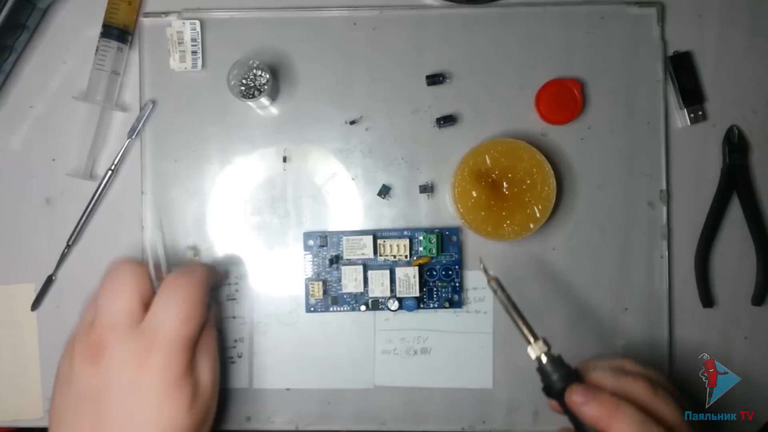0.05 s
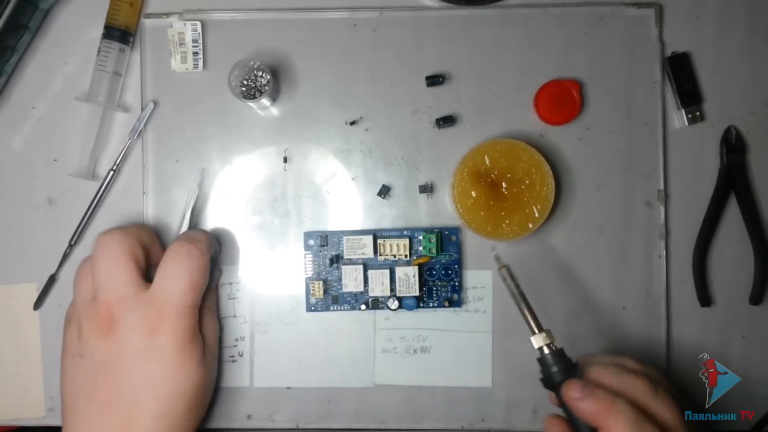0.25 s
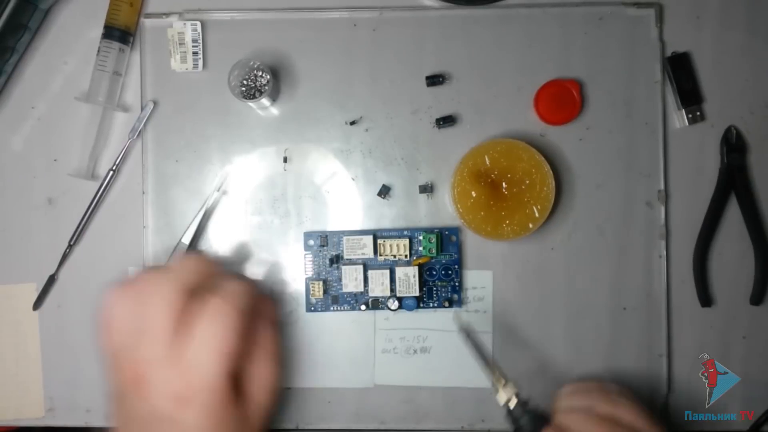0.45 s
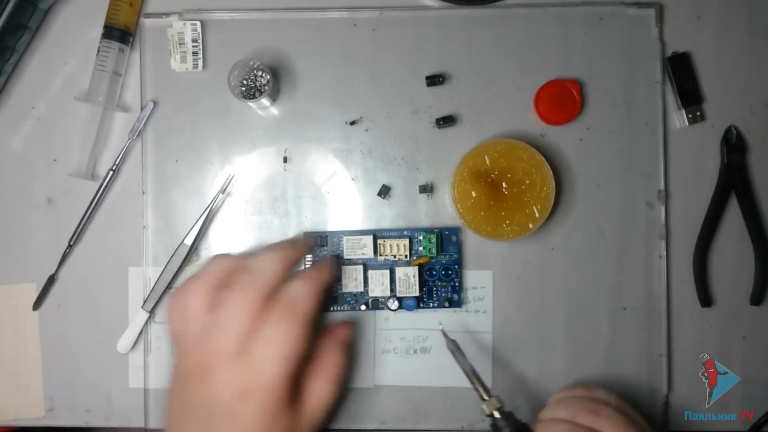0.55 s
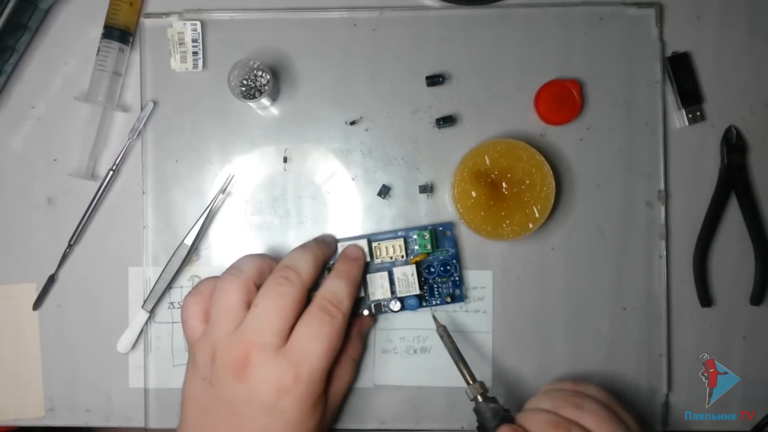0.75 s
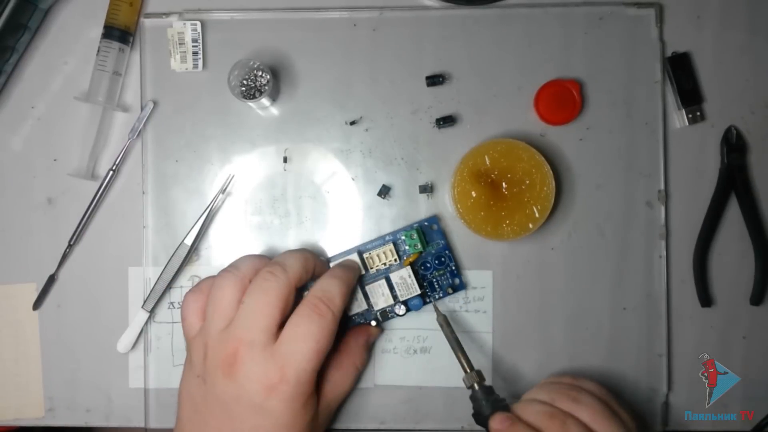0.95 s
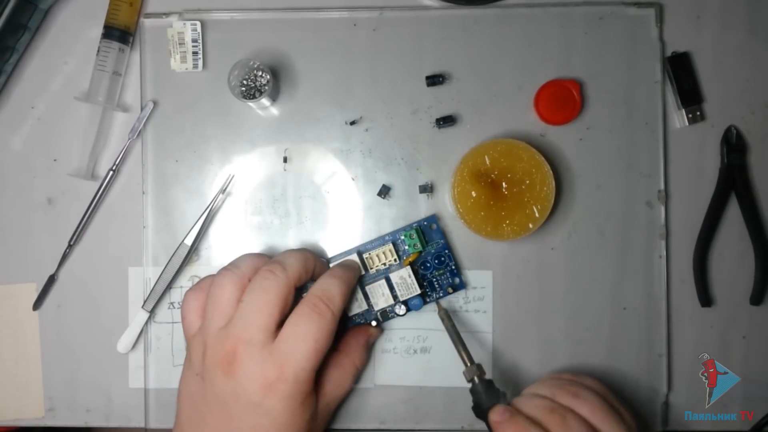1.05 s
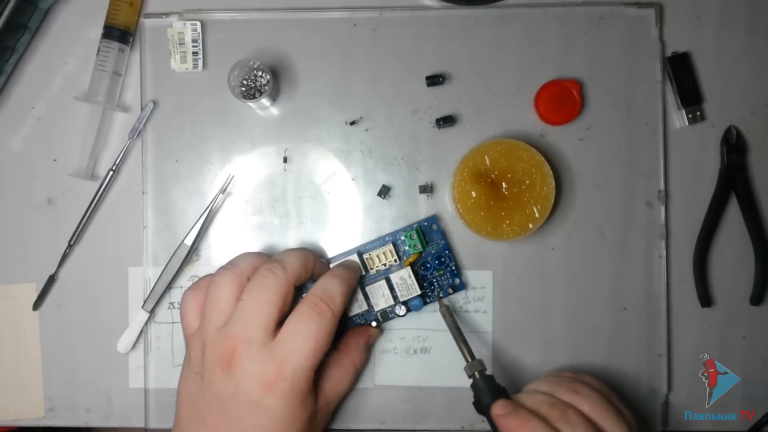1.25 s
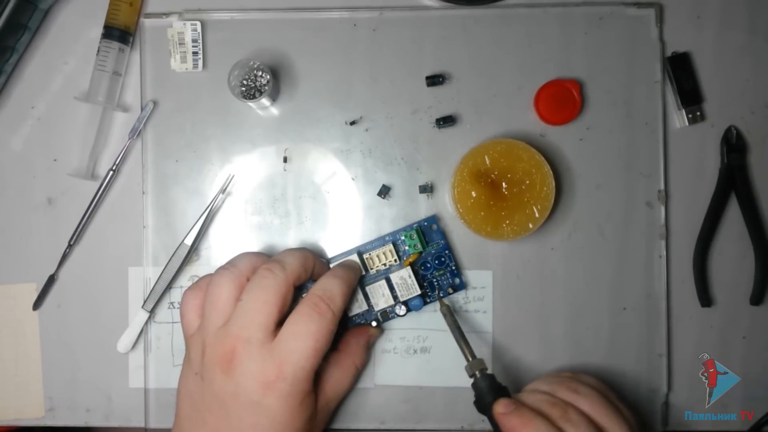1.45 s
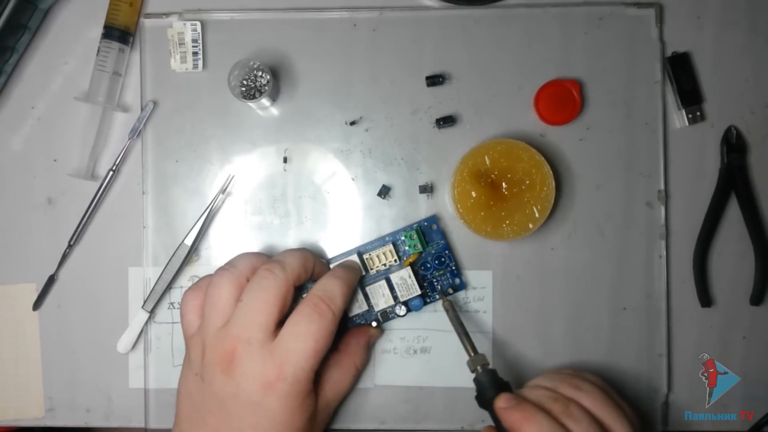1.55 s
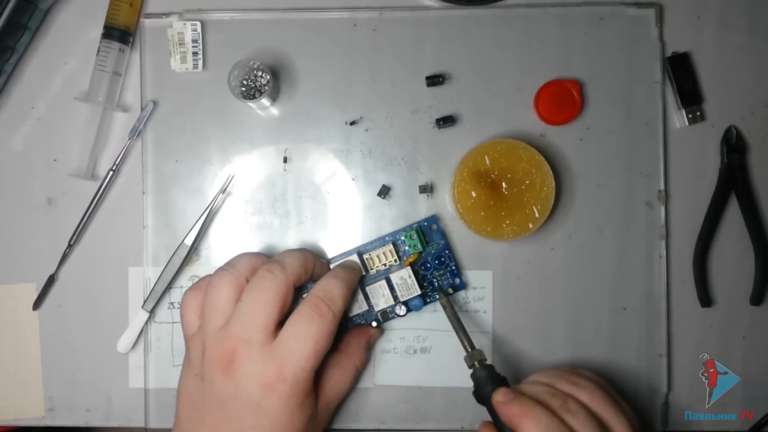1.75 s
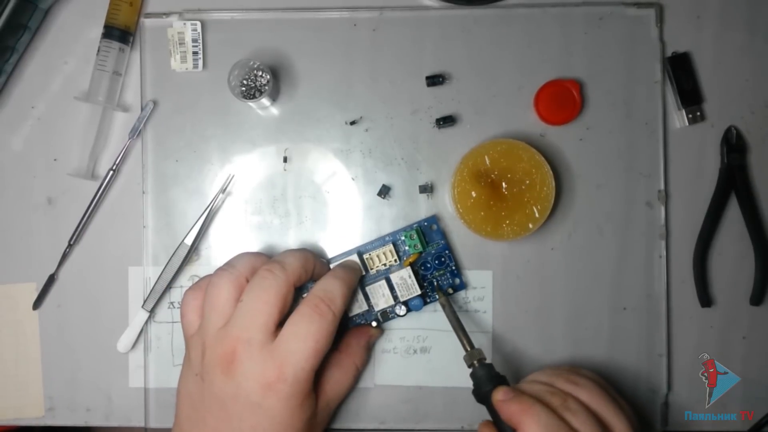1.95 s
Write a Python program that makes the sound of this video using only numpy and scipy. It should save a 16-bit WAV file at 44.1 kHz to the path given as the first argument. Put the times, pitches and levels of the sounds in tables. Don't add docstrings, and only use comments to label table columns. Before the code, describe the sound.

A sharp metallic clatter of tweezers on glass stops quickly, followed by lighter clicks of a circuit board being set down, a faint tap and finger rubs, heard closely over low room hum and hiss.

```python
import sys
import numpy as np
from scipy import signal
from scipy.fft import rfft, irfft
from scipy.io import wavfile

SR = 44100
rng = np.random.default_rng(int(sys.argv[2]) if len(sys.argv) > 2 else 0)


def int16_out(signal):
    q = np.round(np.clip(np.atleast_2d(signal).T, -1, 1) * 32767)
    wavfile.write(sys.argv[1], SR, q.astype(np.int16))


def amplitude_ratio(level_db):
    exponent = np.asarray(level_db, float) / 20
    return 10 ** exponent


N = 88200


def at_hz(points, hz):
    p = np.array(points, float)
    return np.interp(np.log(np.maximum(hz, 1)), np.log(p[:, 0]), p[:, 1])


def curve(rows):
    return np.interp(np.arange(N) / SR, *np.transpose(rows))


def rms_one(x):
    return x / np.sqrt(np.mean(x ** 2) + 1e-20)


def drift(rate):
    knots = rng.standard_normal(200)
    return np.interp(np.arange(N) / SR * rate, np.arange(200), knots)


def colour(x, gain_db):
    return irfft(rfft(x) * amplitude_ratio(gain_db(np.fft.rfftfreq(N, 1 / SR))), N)


def highpass(x, order, hz):
    return signal.sosfilt(signal.butter(order, hz, "high", fs=SR, output="sos"), x)


def bandpass(x, low_hz, high_hz):
    return signal.sosfilt(signal.butter(2, [low_hz, high_hz], "band", fs=SR, output="sos"), x)


def ring(clicks, hz, t60):
    r = amplitude_ratio(-60 / (t60 * SR))
    w = 2 * np.pi * hz / SR
    return signal.lfilter([0, np.sin(w)], [1, -2 * r * np.cos(w), r * r], clicks + 1e-18)


def strike(s, db, pan_db, modes, chance_db, width_db, free=False):
    contact_s, alike = 0.0021, 0.26
    flutter_db, flutter_per_s = 3.5, 95
    damped_cycles = 28
    out = np.zeros((2, N))
    at = np.minimum((s * SR).astype(int), N - 9)
    luck = rng.standard_normal((len(s), len(modes)))
    beam = rng.standard_normal(len(modes))
    white = rng.standard_normal((3, N))
    fade = np.exp(-1 / (contact_s * SR))
    rattle = np.sqrt(alike) * white[0] + np.sqrt(1 - alike) * white[1:]
    rattle = rattle * np.sqrt(1 - fade ** 2)
    for k, (hz, level_db, t60) in enumerate(modes):
        clicks = np.zeros((2, N))
        for c, side in enumerate((.5, -.5)):
            lean_db = side * (pan_db + width_db * beam[k])
            np.add.at(clicks[c], at, amplitude_ratio(db + level_db + chance_db * luck[:, k] + lean_db))
        envelope = signal.lfilter([1], [1, -fade], clicks + 1e-18)
        push = (-1) ** k * (0.52 * clicks + 1.056 * envelope * rattle)
        if free:
            out += ring(push, hz, t60) * amplitude_ratio(flutter_db * drift(flutter_per_s))
        else:
            out += ring(push, hz, min(t60, damped_cycles / hz))
    return out


def crack(s, db, pan_db, low_hz, top_hz):
    crack_db, crack_s = -12, 0.004
    clicks = np.zeros((2, N))
    clicks[:, (s * SR).astype(int)] = amplitude_ratio(db + crack_db + np.outer([.5, -.5], pan_db))
    envelope = signal.lfilter([1], [1, -np.exp(-1 / (crack_s * SR))], clicks + 1e-18)
    return bandpass(envelope * rng.standard_normal((2, N)), low_hz, top_hz)


def click_at(s):
    return 1. * (np.arange(N) == int(s * SR))


def single_modes(rows):
    out = np.zeros((2, N))
    lean_db = 3 * rng.standard_normal(len(rows))
    for (s, hz, db, t60), lean in zip(rows, lean_db):
        out += ring(click_at(s), hz, t60) * amplitude_ratio(db + lean * np.array([[.5], [-.5]]))
    return out


def room_tone():
    # f/Hz, level/dB per Hz
    tone_spectrum = [(15, -36.5), (25, -18.5), (125, -10), (207, -2), (278, -11), (427, -6), (1000, -13),
                     (8320, -24), (15000, -29.5)]
    # f/Hz, width/Hz, level/dB, change/dB per s
    hums = [(85.7, 7.7, -12, 6.5), (153, 20, -13, 3), (211.1, 8.9, -5, -6), (255, 49, -19, 3.5),
            (452.5, 5, -22.5, 4.5), (885, 12, -14.5, 0.8), (8250, 350, -28.5, 14)]
    # f/Hz, likeness/0-1
    likeness = [(60, 0.5), (240, 1), (940, 0.1), (3710, 0), (14700, 0)]
    # t/s, level/dB
    gain_ride = [
        (0.0, -49.5),
        (0.44, -56),
        (0.58, -54),
        (0.82, -57.5),
        (1.34, -59),
        (1.53, -55.5),
        (1.72, -53.5),
        (2.0, -53),
    ]
    tone_db, patchy_db = -9.5, 1.5
    white = rng.standard_normal((2, N))
    alike = lambda hz: np.clip(at_hz(likeness, hz), 0, .98)
    mid = colour(white[0], lambda hz: 10 * np.log10(1 + alike(hz)))
    side = colour(white[1], lambda hz: 10 * np.log10(1 - alike(hz)))
    pair = np.array([mid + side, mid - side])
    out = rms_one(colour(pair, lambda hz: at_hz(tone_spectrum, hz))) * amplitude_ratio(patchy_db * drift(25))
    t = np.arange(N) / SR
    for hz, width_hz, db, change_db in hums:
        hum = signal.lfilter(*signal.iirpeak(hz, hz / width_hz, SR), pair)
        out += amplitude_ratio(db + change_db * (t - 1) + patchy_db * drift(4.5)) * rms_one(hum)
    return out * amplitude_ratio(curve(gain_ride) + tone_db)


def steel(s, db):
    # f/Hz, level/dB, t60/s
    steel_modes = [(4350, -13, 0.26), (4670, -13.5, 0.068), (5900, -9.5, 0.04), (6630, -8.5, 0.088),
                   (7060, -16.5, .12), (7237, -10, 0.12), (7915, -6, 0.11), (8140, -8, .12),
                   (8590, -8.5, .06), (8730, -7, .06), (10005, -15, .12), (11320, -9.5, 0.14),
                   (12235, -15.5, .08), (13345, -12.5, .15)]
    rest_s, rest_loss_db_per_s = .6, 400
    rings = strike(s, db - 16.5, 0, steel_modes, chance_db=4, width_db=2.5, free=True)
    return rings * amplitude_ratio(-rest_loss_db_per_s * np.maximum(np.arange(N) / SR - rest_s, 0))


def glass(s, db, pan_db, width_db):
    # f/Hz, level/dB, t60/s
    glass_modes = [(810, -27, .04), (1600, -31, 0.011), (2200, -25, 0.008), (4960, -14.5, 0.018),
                   (5440, -18.5, 0.0085), (6540, -5, 0.036), (7130, -6, 0.0068), (7430, -9, 0.024),
                   (8180, -6, 0.0082), (9520, -7, 0.0034), (11500, -22, 0.018), (12400, -33, 0.002)]
    return strike(s, db, pan_db, glass_modes, 4, width_db)


def clack(s, db, chance_db, width_db):
    # f/Hz, level/dB, t60/s
    arm_modes = [(2940, -10.5, .012), (3205, -9.5, .012), (3430, -11.5, .01)]
    return strike(s, db, 0, arm_modes, chance_db, width_db)


def tweezer_bounces():
    # t/s, peak level/dB, ring share/dB, clack share/dB
    hits = [(.218, -13.5, 6.5, 1), (0.268, -21, -3.5, 8.5), (0.277, -28, -8.5, -6.5),
            (0.2895, -19.5, -8.5, 6.5), (0.3122, -18.5, -5, 3.5), (.316, -25.5, -9, -3),
            (0.3303, -12, 0.5, -8.5), (0.3384, -10, -3.5, -3.5), (0.353, -17, 1, -2.5),
            (.372, -12.5, -10.5, 5.5), (0.389, -12, -3.5, -1.5), (.3945, -16.5, 1, -6.5),
            (0.4166, -13, -4, -3.5), (.434, -14.5, 2.5, 9), (0.4414, -17, -3, 2), (.456, -20.5, -8, -4),
            (.463, -16, -2, -10), (0.4755, -13.5, -3.5, 1.5), (0.4923, -14.5, -9.5, 3.5),
            (0.5128, -14.5, 1, 0.5), (0.521, -18.5, -3.5, 1), (.534, -15, -3, 0.5), (.544, -21, -5.5, -10),
            (.56, -18.5, -5, -0.5), (0.566, -18, -0.5, -5.5), (0.58, -22, -7, -1), (0.594, -22.5, -3, -7)]
    s, db, ring_db, clack_db = np.transpose(hits)
    out = steel(s, db + ring_db) + glass(s, db - 3.0, -3.5, 3.8)
    out += crack(s, db + 7.0, 0, 3000, 12500)
    return out + clack(s, db + clack_db, 0.58, 0.44)


def room_tail(x):
    # f/Hz, t60/s
    decay = [(300, 0.17), (1500, 0.3), (5000, 0.21), (14000, 0.11)]
    near_db, near_t60_s, early_s = 7, .07, .002
    t = np.arange(SR // 2) / SR
    edges = np.geomspace(100, 16000, 9)
    white, tail = rng.standard_normal((2, len(t))), 0
    for low, high in zip(edges, edges[1:]):
        t60 = at_hz(decay, np.sqrt(low * high))
        tail = tail + bandpass(white, low, high) * amplitude_ratio(-60 * t / t60)
    tail = tail * (1 + amplitude_ratio(near_db - 60 * t / near_t60_s)) * np.clip(t / early_s, 0, 1)
    return signal.fftconvolve(x, tail / np.sqrt(np.sum(tail ** 2) / 2), axes=1)[:, :N]


def accents():
    # t/s, f/Hz, level/dB, t60/s
    favoured = [(.219, 8400, -21, 0.026), (.232, 7237, -30, 0.19), (.219, 11320, -31, .3),
                (.3302, 6200, -17, 0.045), (.3302, 8600, -19.5, 0.035), (.3302, 1180, -43.5, 0.14),
                (.3376, 10750, -29.5, .03), (.345, 780, -44, .05), (.356, 13345, -36, .04),
                (.372, 8600, -20.5, .015), (.3871, 6230, -22.5, .04), (.3871, 800, -42, .05),
                (.4168, 1200, -40.5, .08), (.434, 6220, -22.5, .05), (.4407, 8590, -25, 0.037),
                (.447, 11320, -30, 0.12), (.4749, 6230, -26, 0.019), (.4749, 8500, -28, .02),
                (.478, 800, -50, 0.2), (.4927, 8010, -20, .02), (.494, 12235, -29.5, .09),
                (.496, 10005, -30, 0.11), (.534, 6230, -29.5, .06), (.544, 800, -47.5, 0.11),
                (.565, 6480, -31, .04)]
    return single_modes(favoured)


def tweezer_chatter():
    # t/s, level/dB
    rocking = [
        (.22, -39.5),
        (.3, -44.5),
        (.36, -35.5),
        (.45, -38),
        (.5, -38.5),
        (.58, -35.5),
        (.63, -49.5),
    ]
    chatter_per_s, spread_db, chatter_db, chatter_ring_db = 700, 2.0, 5, -9
    draw = rng.random((400, 2))
    t = rocking[0][0] - np.cumsum(np.log(1 - draw[:, 0])) / chatter_per_s
    size_db = np.interp(t, *np.transpose(rocking), right=-200) + chatter_db
    size_db = size_db - spread_db * np.log(1 - .99 * draw[:, 1])
    out = glass(t, size_db, 0, 1.9) + clack(t, size_db - 8.5, 2.6, 1.1)
    return out + steel(t, size_db + chatter_ring_db)


def thumps():
    # t/s, f/Hz, level/dB, t60/s
    pushes = [(.222, 137, -51.5, 0.19), (.225, 320, -57, 0.071), (.29, 60, -54.5, 0.085),
              (.295, 300, -56, 0.044), (.335, 136, -46, .15), (.395, 60, -57, 0.046),
              (.39, 415, -52, 0.044), (.49, 130, -59.5, .06), (.8, 70.9, -58.5, 0.092)]
    return single_modes(pushes)


def board_and_tip_taps():
    # t/s, peak level/dB, body (rounds to 0 landing, 1 bouncing, 2 set down, 3 tip)
    contacts = [
        (0.7803, -34, 0.5),
        (.782, -27.5, 0),
        (.7926, -20.5, 1),
        (.8021, -35.5, -0.5),
        (0.8084, -31, 1),
        (.819, -40.5, 0.5),
        (1.0243, -33, 2),
        (1.0425, -50.5, 2.5),
        (1.2084, -40, 3),
    ]
    # f/Hz, width/Hz, level/dB
    landing = [(867, 260, -9), (2027, 460, -12), (3930, 450, -4), (5240, 350, -6), (7650, 400, -4.5),
               (9360, 400, -2.5), (10700, 400, -3.5), (12820, 500, -14)]
    bouncing = [(870, 390, -18), (3620, 250, -13.5), (5170, 220, -10), (6480, 220, -5.5), (7500, 220, -3.5),
                (8100, 200, 1.5), (9000, 270, -4)]
    set_down = [(517, 99, -15.5), (785, 60, -10.5), (1180, 79, -9.5), (2210, 460, -8.5), (2647, 150, -5),
                (3080, 170, -3), (3600, 470, -2.5), (4770, 300, -8), (6820, 250, -3.5), (7670, 200, -7),
                (7870, 150, 1.5), (9870, 300, -17)]
    tip = [(915, 118, -7), (1780, 164, -14.5), (4230, 250, -3), (4950, 380, 1.5), (6200, 110, 5.5),
           (6760, 250, 0.5), (7900, 200, 1), (8560, 200, -2), (12250, 300, -27)]
    noise_db = [5, 1.5, 0.5, -0.5]
    pan_db = -2
    out = np.zeros((2, N))
    for k, body in enumerate((landing, bouncing, set_down, tip)):
        s, db = np.transpose([row[:2] for row in contacts if round(row[2]) == k])
        modes = [(hz, level_db, np.log(1000) / np.pi / width_hz) for hz, width_hz, level_db in body]
        out += strike(s, db + 4, pan_db, modes, chance_db=2.5, width_db=3.7)
        out += crack(s, db + noise_db[k], pan_db, 1200, 11000)
    return out


def rubs():
    # t/s, length/s, level/dB
    strokes = [(0.985, 0.046, -67), (1.302, 0.045, -72.5), (1.368, 0.071, -70.5), (1.508, 0.12, -70),
               (1.625, 0.075, -70), (1.796, 0.039, -62), (1.83, 0.098, -69.5), (1.966, 0.09, -63.5)]
    # f/Hz, level/dB per Hz
    rub_spectrum = [(880, -33), (1500, -9), (2500, 4), (2920, 8), (5720, 0.5), (8100, 2.5), (13200, -4),
                    (15000, -9)]
    t, stroke = np.arange(N) / SR, np.zeros(N)
    for s, length, db in strokes:
        stroke += amplitude_ratio(db) * np.clip((t - s) / 0.0019, 0, 1) * np.clip((s + length - t) / 0.009, 0, 1)
    grain = rng.standard_normal((2, N)) * amplitude_ratio(1.3 * drift(71))
    return stroke * rms_one(colour(grain, lambda hz: at_hz(rub_spectrum, hz)))


def tip_pings():
    # t/s, level/dB
    ping_rows = [
        (1.324, -63),
        (1.385, -56.5),
        (1.54, -60.5),
    ]
    out = np.zeros((2, N))
    for s, db in ping_rows:
        out += ring(amplitude_ratio(db) * click_at(s), hz=6240, t60=0.018)
    return out


def microphone_ports(x):
    # f/Hz, left-right level/dB
    tilt = [(500, 3.5), (2000, 0.1), (4000, 0), (6500, 2), (8300, -11), (11000, -2.5), (14000, -4.5)]
    left_lag_s = .00012
    x = np.array([colour(x[c], lambda hz: side * at_hz(tilt, hz)) for c, side in enumerate((.5, -.5))])
    x[0] = np.roll(x[0], int(left_lag_s * SR))
    return x


def scene():
    background = room_tone()
    bench = highpass(tweezer_bounces() + tweezer_chatter(), 4, 880) + accents()
    bench = bench + highpass(board_and_tip_taps() + tip_pings(), 3, 400)
    bench = bench + amplitude_ratio(-1.5) * room_tail(bench) + rubs()
    return microphone_ports(bench) + thumps() + background


def low_pass(x):
    return signal.sosfilt(signal.butter(12, 15280, fs=SR, output="sos"), x)


def record(dry):
    # from t/s, to t/s, low f/Hz, high f/Hz
    starved = [(.226, .305, 11650, 12500), (.245, .295, 400, 590), (.255, .295, 830, 1020),
               (.235, .305, 3720, 3900), (.34, .42, 3700, 3900), (.43, .61, 310, 660),
               (.44, .475, 170, 310), (.5, .635, 1320, 1530), (.52, .6, 950, 1030), (.545, .64, 10, 125)]
    ceiling, starved_db, cutoff_hz = .5, -33.5, 14700
    x, t = ceiling * np.tanh(dry / ceiling), np.arange(N) / SR
    for start, end, low_hz, high_hz in starved:
        band = colour(x, lambda hz: -200. * ((hz < low_hz) | (hz > high_hz)))
        lost = np.clip(np.minimum(t - start, end - t) / .008, 0, 1)
        x = x - band * (1 - amplitude_ratio(starved_db)) * lost
    cut = signal.sosfilt(signal.cheby2(10, 60, cutoff_hz * 1.06, fs=SR, output="sos"), x)
    return low_pass(cut)


dry = scene()
out = record(dry)
int16_out(out)
```